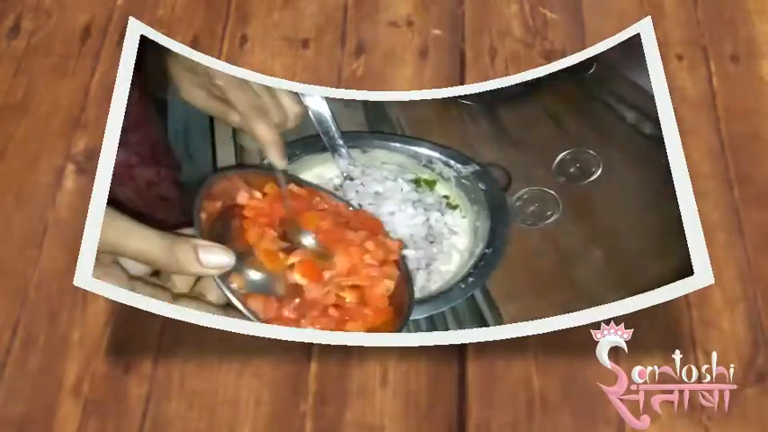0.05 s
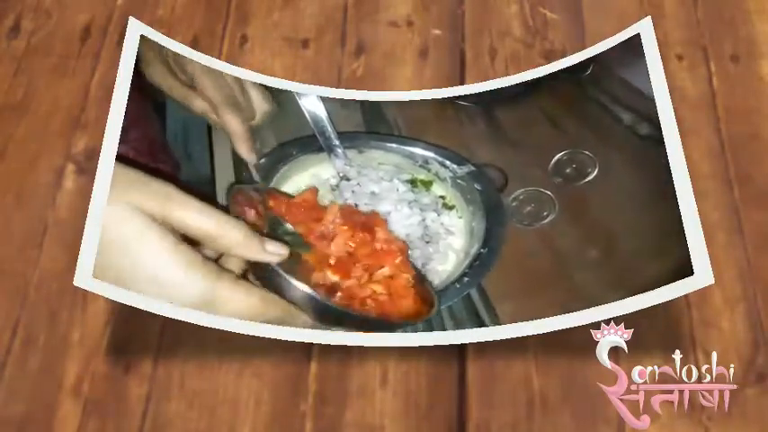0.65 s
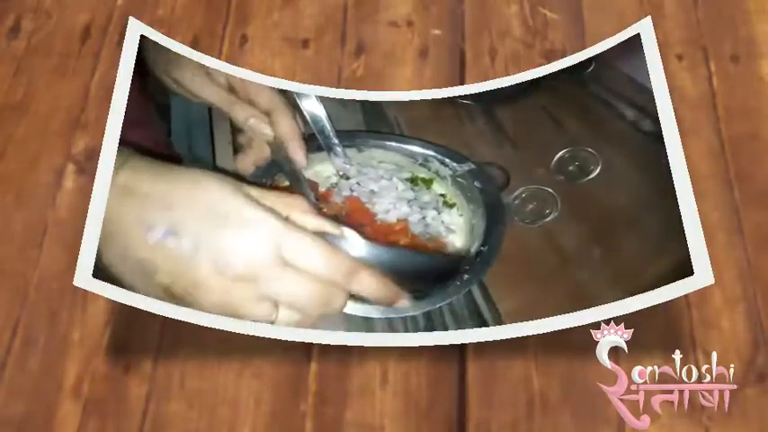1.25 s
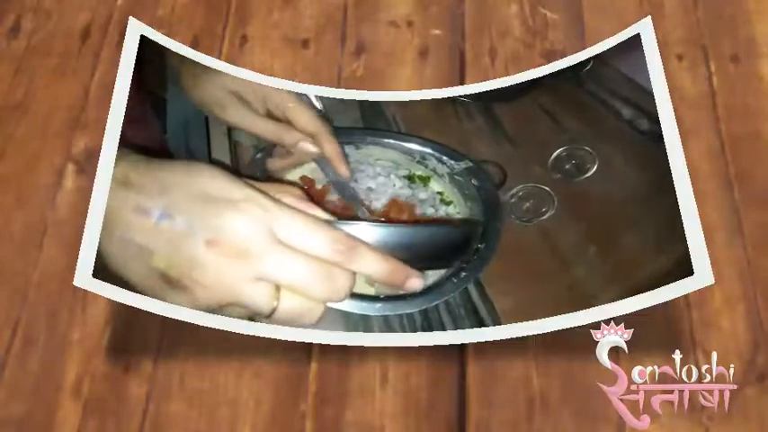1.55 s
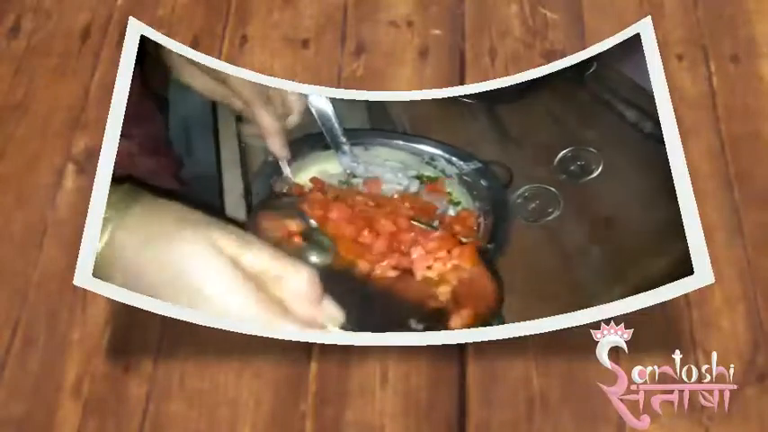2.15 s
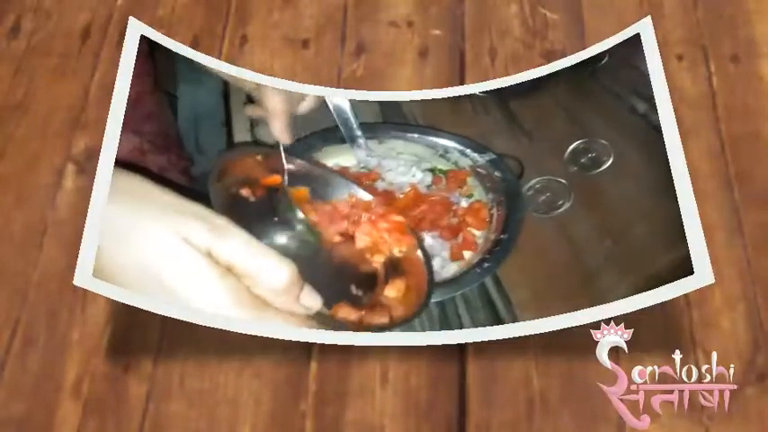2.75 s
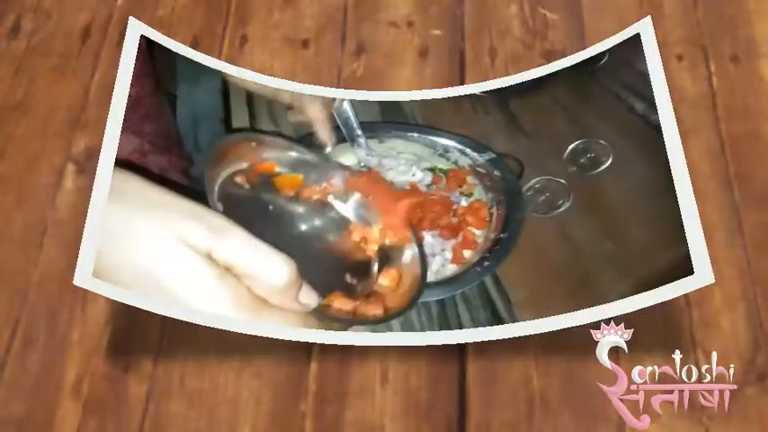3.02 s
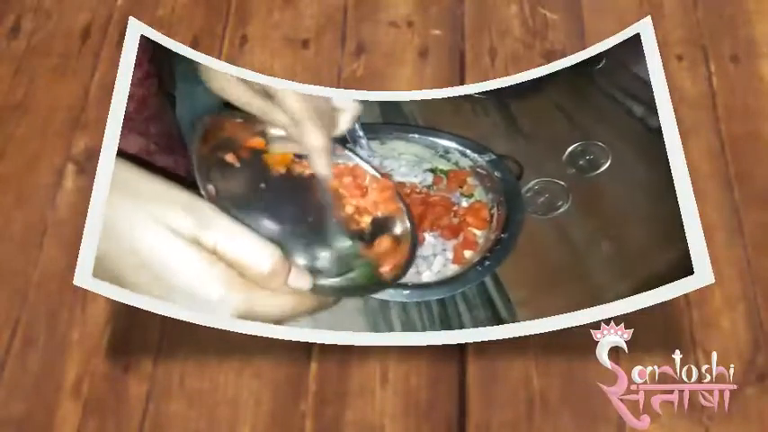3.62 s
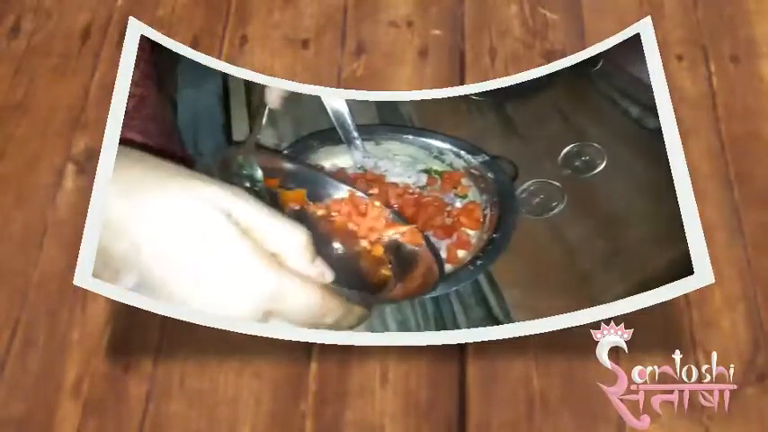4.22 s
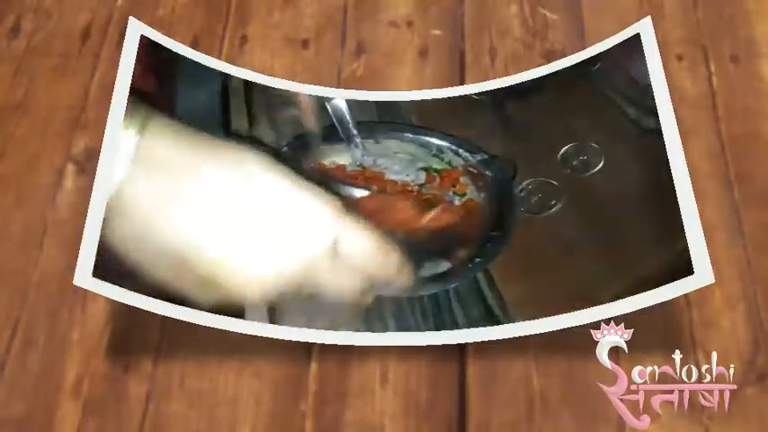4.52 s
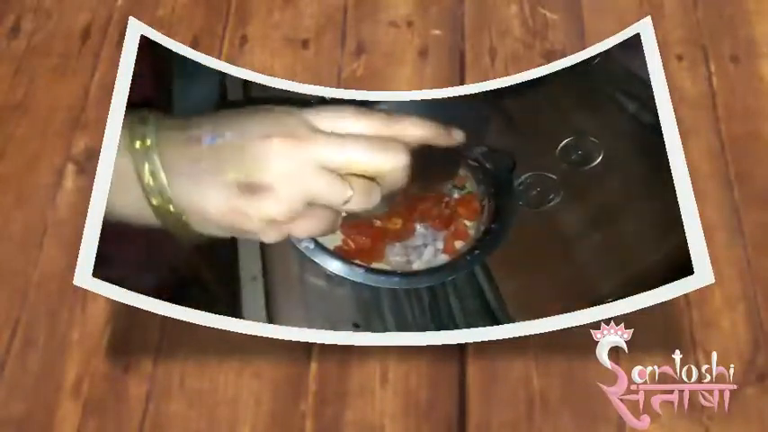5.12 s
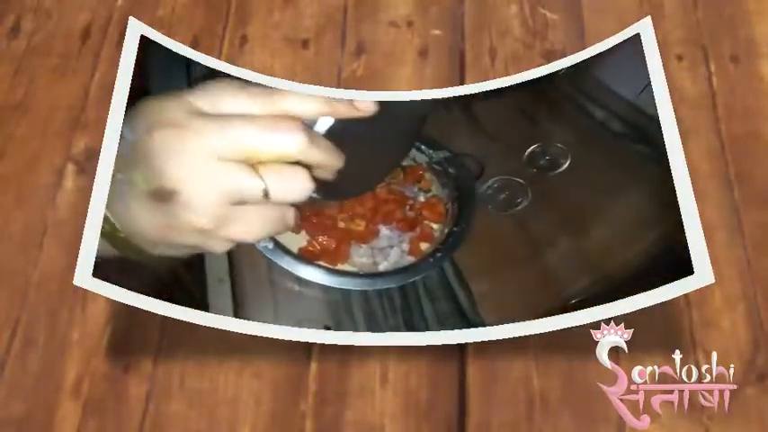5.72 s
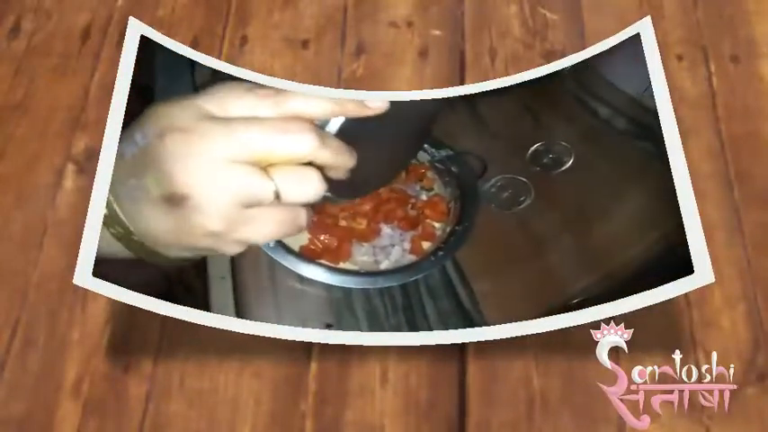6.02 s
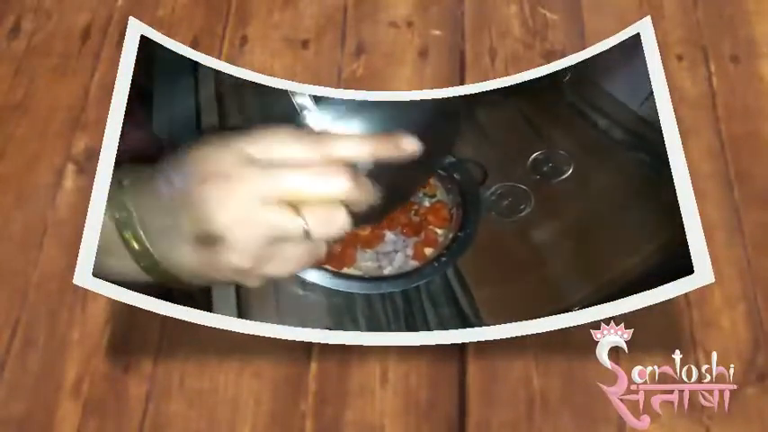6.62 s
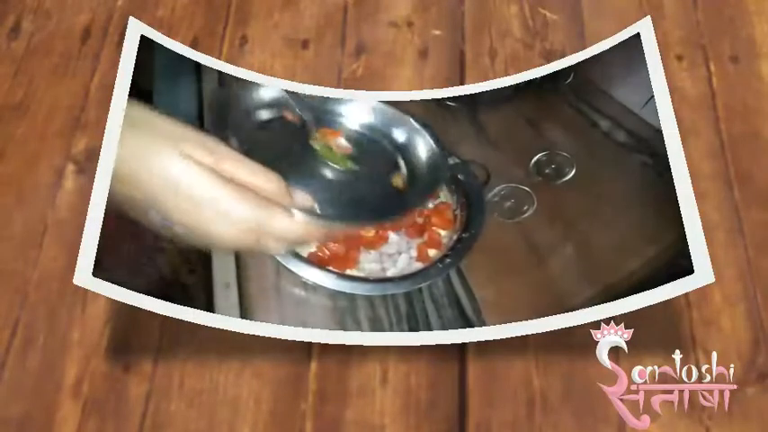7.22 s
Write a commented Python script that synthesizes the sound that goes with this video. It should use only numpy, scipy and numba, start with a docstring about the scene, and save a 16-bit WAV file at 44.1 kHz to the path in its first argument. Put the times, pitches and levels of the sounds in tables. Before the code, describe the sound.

Short clinks and rasping scrapes of a spoon emptying chopped vegetables from a hand-held metal bowl in a quiet kitchen.

```python
"""A steel spoon knocks on a hand-held steel bowl and scrapes chopped vegetables out of it into batter.
Each impact excites the bowl's modes, which the hand and the wet food damp quickly. Most strokes start
with such a knock and go on as gritty stick-slip friction, which once locks into a brief squeal.
For the last three strokes the bowl is turned over and scraped nearly bare, and its upper modes ring
longer. The small kitchen murmurs faintly."""
import sys
import numpy as np
from scipy import signal
from scipy.fft import rfft, irfft, next_fast_len
from scipy.io import wavfile
from numba import njit

SR = 44100
rng = np.random.default_rng(int(sys.argv[2]) if len(sys.argv) > 2 else 0)


def file_out(sig):
    """Save sig as 16-bit WAV at sys.argv[1]."""
    # one column per channel
    cols = np.atleast_2d(sig).T
    # limit, then scale
    lim = np.clip(cols, -1, 1)
    pcm = np.round(lim * 32767).astype(np.int16)
    wavfile.write(sys.argv[1], SR, pcm)


N = 319868
TIME, RING_TIME = np.arange(N) / SR, np.arange(SR // 2) / SR
TURN_S = 5.0  # the bowl is upturned from here on

# Impacts of spoon on bowl. Each row: start in seconds, relative level in dB, thud, clang and brightness
# in dB against that level, trim of the free ring in dB, t60 of the crack in seconds.
KNOCKS = [(0.1362, -29, -7, -17.5, -17, -17, .029), (0.6283, -35, 2, 0, 0, -12, .056),
          (0.9188, -24, -15, -18, -17, -10, .038), (1.1168, -50, -7, -18, -20, -13, .033),
          (1.4443, -40.5, -2, 2.5, -1.5, -25, .045), (2.315, -47, -3, -9, -5, -20, .03),
          (2.3245, -35.5, -7, -13, -5, -30, .022), (2.3765, -42, -14, -8, -2, -11, .033),
          (2.9199, -27.5, -1, -4, -3.5, -10, .042), (3.1377, -27, -3.5, -.5, -7.5, 0, .03),
          (3.4736, -31.5, 1.5, -11, -8, 13, .038), (3.5352, -39.5, -8, -10, -8, -6, .024),
          (3.621, -47, 0, -2, 8, -8, .021), (3.6625, -49, 3, 0, -3, -16, .03),
          (4.2592, -35, -1, -2, 2, -26, .043), (4.3187, -24, -10, -8, -4, -20, .06),
          (4.5302, -31.5, -4, -3, 3, -10, .061), (4.6894, -48, -2, -5, 3, -20, .18),
          (4.711, -50, -1, 6, 15, -30, .022), (4.8023, -45, -6, -1, 3, -23, .064),
          (5.1562, -19, -9, -12, -10, -9, .1), (5.7574, -26, -.5, -14, 1, -4, .059),
          (6.2736, -26.5, -2, -15, -1, -3, .1), (6.392, -37, -2, 4, -1, -4, .15)]
# Modes of the bowl, tilted with food inside, then upturned and nearly empty.
# Each row: frequency in Hz, level in dB, free t60 in seconds.
TILTED_MODES = [(619, 0, .31), (1005, -5, .16), (1136, -8, .2), (1254, -6, .2), (1487, -12, .14),
                (1728, -13, .12), (2180, -8, .14), (2550, -9, .11), (3200, -15, .06), (3815, -14, .06),
                (4190, -13, .06), (4610, -12, .06), (5066, -13, .06), (5295, -12, .05), (6240, -11, .05),
                (6950, -13, .04), (7500, -13, .04), (7970, -12, .04), (9300, -12, .04), (9700, -11, .04),
                (10500, -12, .04)]
UPTURNED_MODES = [(615, 0, .22), (974, -5, .3), (1006, -1, .28), (1378, -8, .18), (1670, -8, .2),
                  (1962, -12, .25), (2003, -12, .2), (2260, -12, .15), (2548, -11, .16), (2920, -15, .15),
                  (4000, -17, .2), (4170, -17, .2), (5285, -8, .14), (5650, -10, .2), (5835, -9, .15),
                  (6135, -10, .15), (7343, -11, .15), (7480, -11, .12), (7750, -12, .12), (8892, -10, .22),
                  (9027, -9, .2), (9453, -12, .18), (9860, -10, .15), (10200, -10, .15), (11020, -13, .18)]


def knocks(level_db=-1.5, ring_db=7.0, clack_db=5.5, tail_db=-17.5):
    """Impact excitation: a noisy crack, modes choked by the spoon, a free ring and the room's tail."""
    # Thud, body, clang and brightness bands. Each row: lower and upper edge in Hz.
    bands_hz = [(430, 740), (720, 2080), (2800, 5780), (6200, 11400)]
    out = np.zeros(N + len(RING_TIME))
    attack = slice(0, SR // 100)
    for start, strength, thud, clang, bright, free_db, crack_t60 in KNOCKS:
        modes = TILTED_MODES if start < TURN_S else UPTURNED_MODES
        levels = level_db + strength + np.array([thud, 0, clang, bright])
        clack = from_db(clack_db) * bowl_ring(modes, uneven_db=5.0, t60_scale=.2)
        ring = clack + from_db(ring_db + free_db) * bowl_ring(modes)
        snap = dying_noise(t60=.0087)
        crack = snap + dying_noise(crack_t60) + from_db(tail_db) * dying_noise(t60=.3)
        at = round(start * SR)
        for edges, db in zip(bands_hz, levels):
            noise = band(crack, edges)
            part = noise / np.std(noise[attack]) + band(ring, edges)
            out[at:at + len(part)] += from_db(db) * part / np.std(part[attack])
    return out[:N]


def strokes(rasp_db=-.3, rumble_lead_s=.005, rumble_lag_s=.008):
    """Friction noise follows each push, over a dull rumble; on release the treble decays first."""
    # Each row: start and length in seconds; in dB, rasp level, swell over the push, brightness against
    # the rasp, brightening over the push, steely edge against brightness, rumble level;
    # then the rasp's release t60 in seconds.
    pushes = [(0.150, .13, -49, -6, -21.5, -4, 2, -45, .36), (0.342, .034, -49.5, 0, -25, -2, 3, -45, .08),
              (0.645, .062, -41, -1, -3, 2, -1, -41, .15),
              (0.935, .078, -39, -7, -17.5, -6, -1, -43.5, .11),
              (1.458, .102, -47, -10, 0, 4, -1, -47, .15),
              (2.335, .243, -45.5, 4.5, -3.5, -5, -11.5, -50, .21),
              (2.940, .143, -44.5, -1, 6, 9, -5.5, -51, .21), (3.170, .04, -46.5, -3, -5, -3, 0, -51, .36),
              (3.495, .22, -46.5, -3, -4.5, 4, -4, -48.5, .35),
              (3.732, .043, -47, 0, 7, -3, -8, -50.5, .36),
              (3.855, .097, -43.5, 2, -7.5, -3, -1.5, -49.5, .24),
              (4.272, .09, -39, -1, -8, -3, -3.5, -43.5, .1), (4.428, .022, -46, 13, 5, 1, -5, -50, .06),
              (4.462, .106, -37.5, 2, 1, -12, -2, -42, .17),
              (4.724, .082, -40, -11, -4, -5, -2.5, -43, .19),
              (5.176, .127, -32, -5, -.5, 10, -6.5, -39.5, .1),
              (5.320, .11, -32, -1, -3.5, -5, -8.5, -38.5, .1),
              (5.465, .04, -34.5, 0, -1.5, 1, -3.5, -39.5, .21),
              (5.780, .095, -46, 1.5, -1, 0, -16, -47, .24), (5.910, .093, -42.5, -6, 2, -9, -9, -48, .35),
              (6.290, .11, -37.5, -4, -2, -5, -2.5, -40.5, .21)]
    # Rumble, rasp, steely edge and hiss bands. Each row: lower and upper edge in Hz.
    bands_hz = [(22, 450), (450, 2700), (2700, 5200), (5200, 15800)]
    # Spectra of the grit in each grip and of the rumble. Each row: frequency in Hz, relative gain in dB.
    tilted_colour = [(210, -32.5), (350, -6), (864, 0.5), (1010, 6.5), (1190, -9.5), (1280, -3.5),
                     (1940, -9.5), (2170, -3.5), (2350, -9), (2620, -14.5), (2800, -14), (4430, -7),
                     (5190, -10.5), (9940, -7), (15500, -24.5)]
    upturned_colour = [(210, -44), (350, -13.5), (488, -13), (610, -6), (671, -10.5), (878, -4.5),
                       (997, 0.5), (1130, -9.5), (1710, -12), (3660, -21.5), (5980, -16.5), (9940, -12),
                       (15500, -25)]
    rumble_colour = [(20, -28), (42, -20), (62, -12), (82, -16), (100, -1), (140, 0), (220, -3),
                     (300, -6.5), (450, -7)]
    tilted = scraping(TILTED_MODES, tilted_colour, ring_db=-8.0, t60_scale=.7,
                      wash_db=0.0, wash_s=.0046, lowest_hz=1065)
    upturned = scraping(UPTURNED_MODES, upturned_colour, ring_db=-3.3, t60_scale=.5,
                        wash_db=2.8, wash_s=.006, lowest_hz=620)
    rumble = unit_rms(band(coloured(rng.standard_normal(N), rumble_colour), bands_hz[0]))
    rasp, edge, hiss = [np.where(TIME < TURN_S, unit_rms(band(tilted, hz)), unit_rms(band(upturned, hz)))
                        for hz in bands_hz[1:]]
    gains = np.zeros((4, N))
    for start, length, db, swell, bright, brightening, steely, rumble_db, release in pushes:
        rumble_s = length + rumble_lead_s + rumble_lag_s
        low = push(start - rumble_lead_s, rumble_s, rumble_db, .5 * swell, 1.3 * release)
        middle = push(start, length, db + rasp_db, swell, release)
        high = push(start, length, db + bright, swell + brightening, .72 * release)
        # One spoon: each push takes over from the last.
        gains = np.maximum(gains, [low, middle, from_db(steely) * high, high])
    return np.sum(gains * [rumble, rasp, edge, hiss], axis=0)


def scraping(modes, colour, ring_db, t60_scale, wash_db, wash_s, lowest_hz):
    """Forced vibration: slips sound directly, through the modes and as a wash following their energy."""
    slips = unit_rms(friction(slips_per_s=2800, size_db=3.6, judder_db=1.6, judder_per_s=150))
    energy = signal.lfilter([1], [1, -np.exp(-1 / (wash_s * SR))], slips ** 2)
    wash = unit_rms(np.sqrt(energy) * rng.standard_normal(N))
    wall = signal.fftconvolve(slips, dying_noise(t60=.093))[:N]
    wall = unit_rms(band(wall, (3200, 15000)))  # crowded upper modes
    grit = unit_rms(coloured(slips + from_db(wash_db) * wash + from_db(.1) * wall, colour))
    ring = signal.fftconvolve(slips, bowl_ring(modes, t60_scale=t60_scale))[:N]
    ring = unit_rms(band(ring, (lowest_hz, 15000)))  # sliding hardly stirs the lowest mode
    return rim_echoes(grit + from_db(ring_db) * ring)


def friction(slips_per_s, size_db, judder_db, judder_per_s):
    """Stick-slip motion: a random train of tiny, uneven impulses whose strength comes in clumps."""
    slips = rng.random(N) < slips_per_s / SR
    uneven_db = size_db * np.minimum(rng.exponential(1, N), 4)
    sizes = from_db(uneven_db + judder_db * drift(judder_per_s))
    return slips * sizes * rng.choice([-1, 1], N)


def bowl_ring(modes, uneven_db=0.0, t60_scale=1):
    """Modal superposition: the spot touched sets strengths and signs; a pressed spoon adds damping."""
    strengths = from_db(rng.normal(0, uneven_db, len(modes))) * rng.choice([-1, 1], len(modes))
    return sum(strength * from_db(db) * decay(t60 * t60_scale) * np.sin(2 * np.pi * hz * RING_TIME)
               for strength, (hz, db, t60) in zip(strengths, modes))


def rim_echoes(x, reflection=.55):
    """Comb filtering: short bending waves return from the rim with delays that vary as the spoon moves."""
    treble = signal.sosfilt(signal.butter(2, 3000, "high", fs=SR, output="sos"), x)
    lags = [lag_s * (1 + .09 * drift(11)) for lag_s in (.0009, .0021)]
    return x + sum(reflection * np.interp(TIME - lag, TIME, treble) for lag in lags)


def push(start, length, db, swell_db, release_t60, longest_rise_s=.04):
    """Envelope of a driven vibration: it rises, swells or fades evenly, then decays freely."""
    t = TIME - start
    # The rise is quicker just after a knock.
    rise_s = min([longest_rise_s] + [start - knock_s for knock_s, *_ in KNOCKS if knock_s < start])
    rise = np.clip(1 + t / rise_s, 0, 1)
    progress = np.clip(t / length, 0, 1)
    released_s = np.clip(t - length, 0, 1)
    return rise * from_db(db + swell_db * (progress - .5)) * decay(release_t60, released_s)


def narrow_resonances(stage_width_hz=900):
    """Resonant filtering of rough noise: brief rings after some knocks, steady or gliding in scrapes."""
    # Each row: start and length in seconds, first and last frequency in Hz, level and swell in dB,
    # release t60 in seconds.
    resonances = [(0.932, .063, 2150, 1990, -46, -6, .15), (2.455, .095, 1080, 1480, -43, 2, .15),
                  (3.150, .06, 4600, 4600, -46, -10, .27), (3.865, .085, 1980, 1550, -51, 1, .15),
                  (5.160, .05, 2650, 2350, -38, -11, .3), (5.205, .145, 5500, 5600, -45, 5, .15),
                  (5.240, .06, 9050, 9050, -39, -1, .12), (5.220, .22, 7500, 7600, -43, 0, .15),
                  (5.380, .05, 1200, 1500, -37, 6, .1), (5.440, .04, 2000, 3100, -39, -7, .12),
                  (5.768, .09, 5600, 5730, -47, -14, .2), (5.915, .055, 1350, 2600, -44, 4, .14)]
    rough_noise = friction(slips_per_s=1500, size_db=2.5, judder_db=1.5, judder_per_s=120)
    radius = np.exp(-np.pi * stage_width_hz / SR)
    out = np.zeros(N)
    for start, length, from_hz, to_hz, db, swell, release in resonances:
        angle = 2 * np.pi * np.interp(TIME, [start, start + length], [from_hz, to_hz]) / SR
        broad = gliding_resonance(rough_noise, angle, radius)
        narrow = gliding_resonance(broad, angle, radius)
        out += unit_rms(narrow) * push(start, length, db, swell, release)
    return out


@njit
def gliding_resonance(x, angle, radius):
    """A two-pole resonator whose centre, an angle in radians per sample, can move."""
    y = np.zeros(len(x))
    for i in range(2, len(x)):
        drive = (1 - radius * radius) / 2 * (x[i] - x[i - 2])
        y[i] = drive + 2 * radius * np.cos(angle[i]) * y[i - 1] - radius * radius * y[i - 2]
    return y


def squeal(mode_hz=2180, jitter=.006, flutter_db=2.5):
    """Mode locking: sticking and slipping fall in step with one mode and give a short, unsteady tone."""
    # The squealing push: start and length in seconds, level and swell in dB, release t60 in seconds.
    squeal_push = (4.464, .04, -41, -6, .13)
    phase = 2 * np.pi * np.cumsum(mode_hz * (1 + jitter * drift(120))) / SR
    tone = np.sin(phase) * from_db(flutter_db * drift(150))
    return unit_rms(tone) * push(*squeal_push)


def room(start_db=-57.1, fade_db_per_s=.28, waver_db=1.0):
    """Ambient noise: a dull murmur that wavers and slowly fades."""
    # Spectrum of the murmur. Each row: frequency in Hz, relative gain in dB.
    colour = [(15, -57.5), (25, -29.5), (69, -13.5), (86, -5), (133, -0.5), (246, -7), (289, -15),
              (322, -5), (368, -19.5), (399, -10.5), (495, -15), (826, -12), (1660, -19), (4870, -35.5),
              (15500, -41.5)]
    level_db = start_db - fade_db_per_s * TIME + waver_db * drift(22)
    return from_db(level_db) * unit_rms(coloured(rng.standard_normal(N), colour))


def decay(t60, t=RING_TIME):
    """Free exponential decay, falling 60 dB in t60 seconds."""
    return np.exp(-np.log(1000) * t / t60)


def dying_noise(t60):
    """Modal overlap: countless close modes decay together as noise."""
    return rng.standard_normal(len(RING_TIME)) * decay(t60)


def drift(knots_per_s):
    """Random fluctuation of unit rms, linear between knots."""
    knots = rng.standard_normal(4000)
    return unit_rms(np.interp(TIME * knots_per_s, np.arange(len(knots)), knots))


def coloured(x, colour):
    """Spectral shaping by a gain curve interpolated over log frequency."""
    hz, db = np.transpose(colour)
    size = next_fast_len(N)
    bin_hz = np.maximum(np.arange(size // 2 + 1) * SR / size, 1)
    gain = from_db(np.interp(np.log(bin_hz), np.log(hz), db))
    return irfft(rfft(x, size) * gain, size)[:N]


def band(x, edges_hz):
    """Causal band-pass filtering."""
    return signal.sosfilt(signal.butter(3, edges_hz, "band", fs=SR, output="sos"), x)


def from_db(db):
    """Decibels to amplitude ratio."""
    return 10 ** (np.asarray(db) / 20)


def unit_rms(x):
    """Normalisation to unit mean power."""
    return x / np.sqrt(np.mean(x ** 2) + 1e-20)


def scene():
    """Superposition of close knocks and scrapes with the room's murmur, in one channel."""
    return (knocks() + strokes() + narrow_resonances() + squeal() + room())[None]


def record(dry, cutoff_hz=15700):
    """Band limiting: a steep low-pass removes the highest treble."""
    return signal.sosfilt(signal.ellip(10, .2, 70, cutoff_hz, fs=SR, output="sos"), dry)


dry = scene()
out = record(dry)
file_out(out)
```